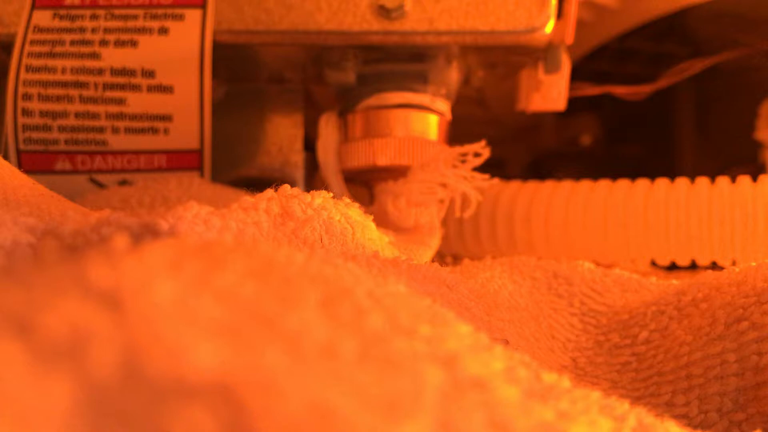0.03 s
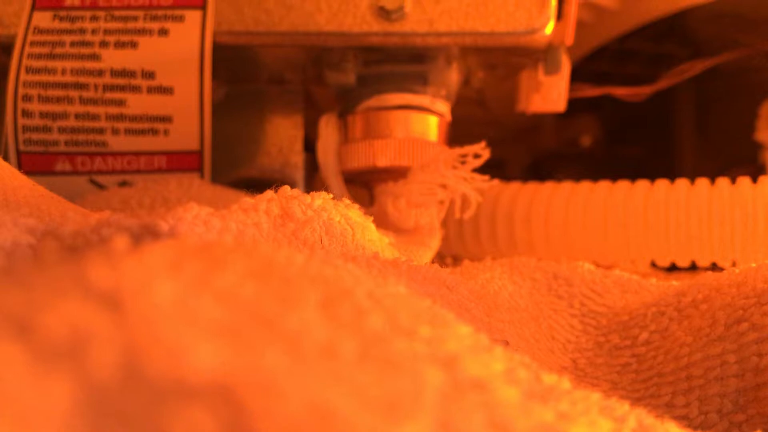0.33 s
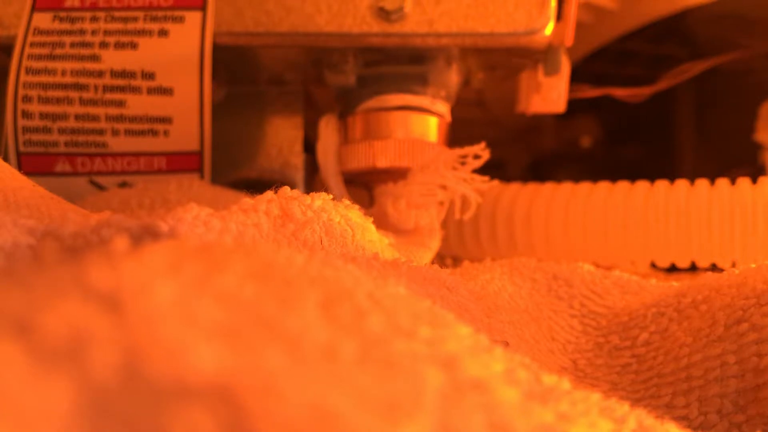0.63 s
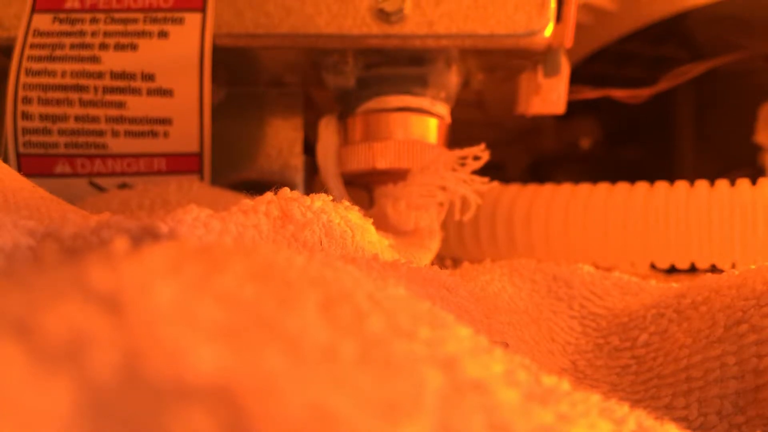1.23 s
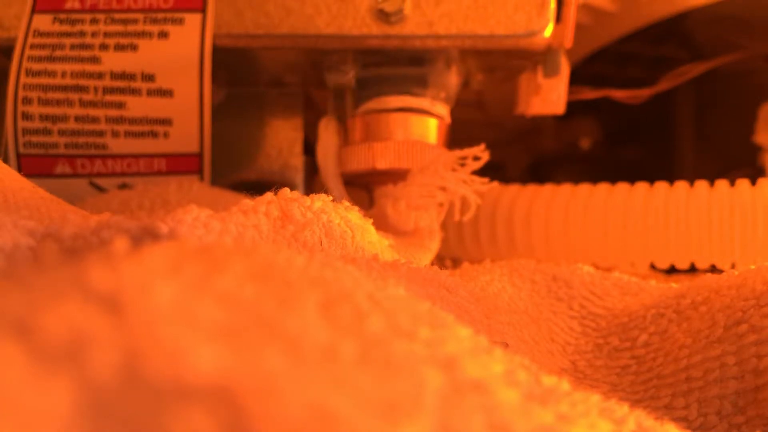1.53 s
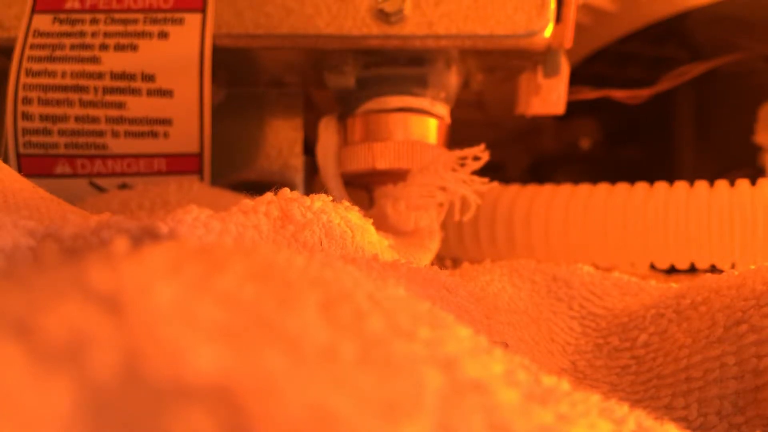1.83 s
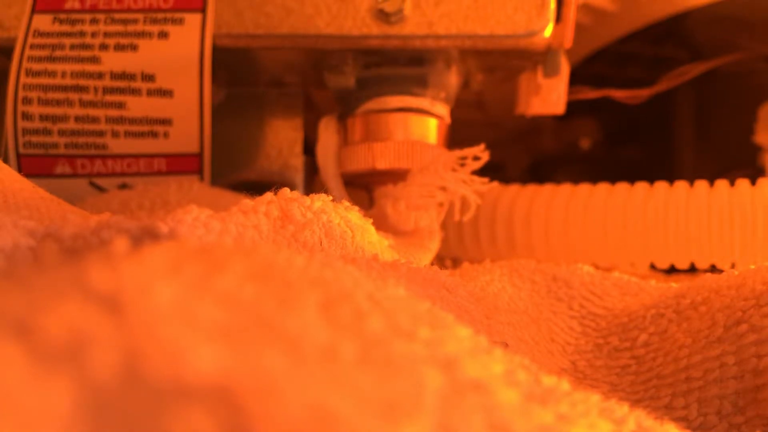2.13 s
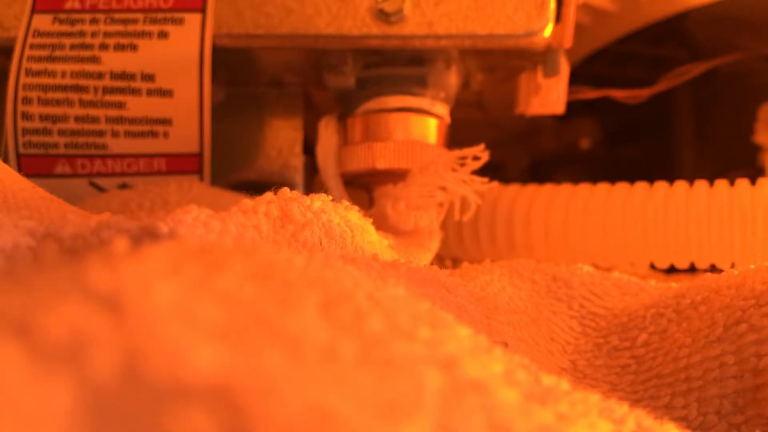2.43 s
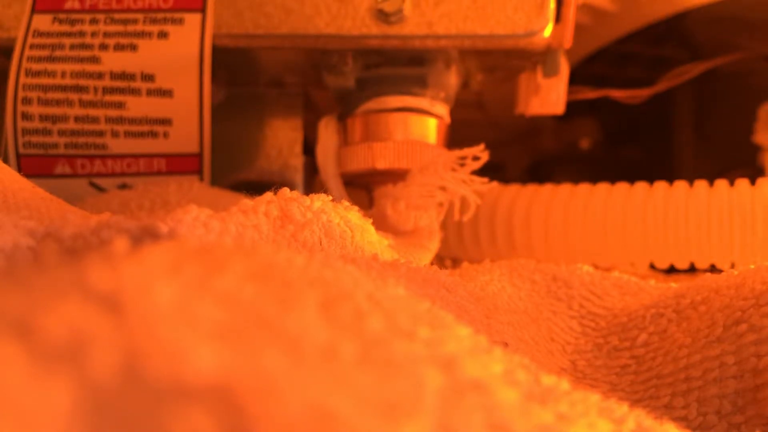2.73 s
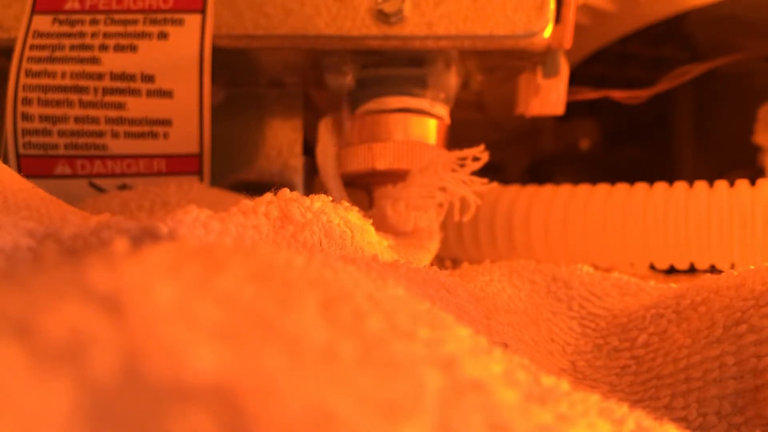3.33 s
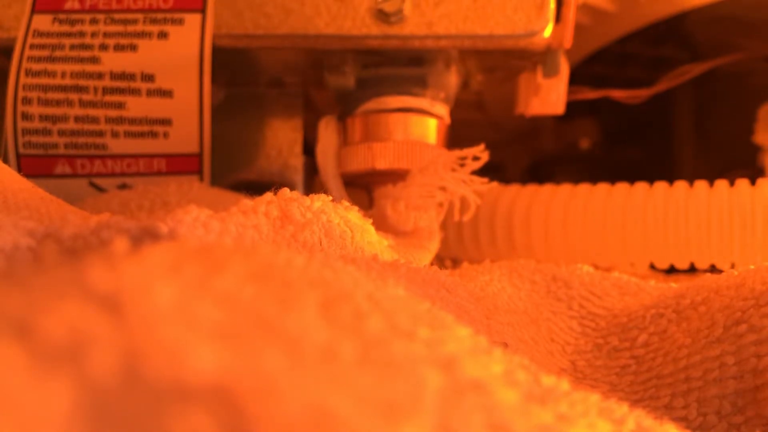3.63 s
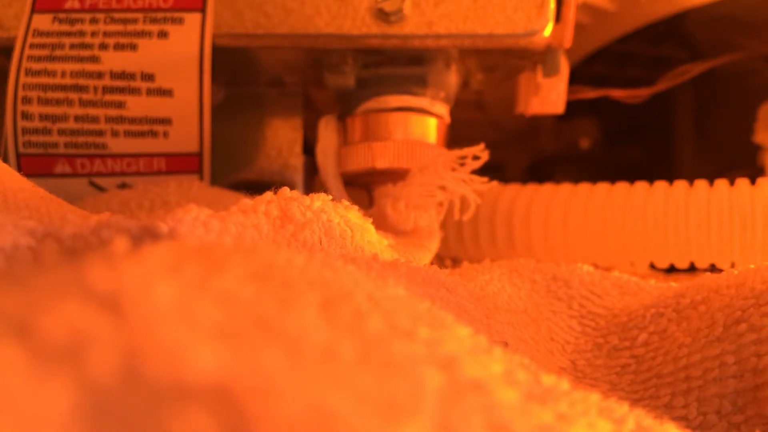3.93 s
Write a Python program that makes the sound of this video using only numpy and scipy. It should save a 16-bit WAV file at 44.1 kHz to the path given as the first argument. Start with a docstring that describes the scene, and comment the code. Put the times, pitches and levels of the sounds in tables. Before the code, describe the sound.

A dishwasher runs steadily indoors, heard close to its underside. Water rumbles in uneven surges while spray drums on the tub, over a faint motor hum, thin whine and hiss. Tiny ticks come twice.

```python
"""Dishwasher running, heard close to its underside.

Spray drums on the tub and rings its panels, water rumbles in the sump and splashes faintly inside.
The pump motor hums with a thin whine over a steady hiss, and a tiny cluster of ticks comes twice."""
import sys
import numpy as np
from scipy import signal
from scipy.fft import rfft, irfft
from scipy.io import wavfile
from scipy.ndimage import uniform_filter1d

SR = 44100
rng = np.random.default_rng(int(sys.argv[2]) if len(sys.argv) > 2 else 0)


def master_out(mix):
    """Clip the mix to full scale and print it as 16-bit PCM to the path in sys.argv[1]."""
    frames = np.transpose(np.atleast_2d(mix))
    ceiling = np.clip(frames, -1, 1)
    pcm = np.round(ceiling * 32767).astype(np.int16)
    wavfile.write(sys.argv[1], SR, pcm)


N = 176400
TIME = np.arange(N) / SR
FREQ_HZ = np.fft.rfftfreq(N, 1 / SR)


def from_db(db):
    """Decibels to gain."""
    return 10 ** (np.asarray(db) / 20)


def unit_rms(x):
    """Scale to rms 1."""
    return x / np.sqrt(np.mean(x ** 2) + 1e-20)


def envelope(rows, trim_db=0):
    """Gain curve through (time_s, level_db) rows, linear in dB."""
    return from_db(trim_db + np.interp(TIME, *np.transpose(rows)))


def drift(rate_hz):
    """Slow random wander; mean 0, rms 1."""
    slow = irfft(rfft(rng.standard_normal(N)) / (1 + (FREQ_HZ / rate_hz) ** 2), N)
    return unit_rms(slow - slow.mean())


def colour(x, spectrum):
    """Minimum-phase filter through (freq_hz, gain_db) rows; output rms 1."""
    hz, db = np.transpose(spectrum)
    gain = from_db(np.interp(np.log(FREQ_HZ + 1), np.log(hz), db))
    cepstrum = irfft(np.log(gain), N)
    cepstrum[1:N // 2] *= 2
    cepstrum[N // 2 + 1:] = 0
    return unit_rms(irfft(rfft(x) * np.exp(rfft(cepstrum)), N))


def resonate(x, centre_hz, width_hz):
    """Resonator applied twice for steep skirts; output rms 1."""
    b, a = signal.iirpeak(centre_hz, centre_hz / width_hz, fs=SR)
    return unit_rms(signal.lfilter(b, a, signal.lfilter(b, a, x)))


def hold_rms(x, window_s):
    """Hold the running rms near 1."""
    return x / np.sqrt(uniform_filter1d(x ** 2, int(window_s * SR)) + 1e-12)


def impacts(drops_per_s=2200, spread_db=1.5, wash_db=-1.5):
    """Drops of uneven size hit the wall over a smooth wash of running water."""
    sizes = from_db(spread_db * np.minimum(rng.exponential(1, N), 4))
    signs = rng.choice([-1, 1], N)
    hits = rng.random(N) < drops_per_s / SR
    drops = unit_rms(sizes * signs * hits)
    return unit_rms(drops + from_db(wash_db) * rng.standard_normal(N))


# Midrange drumming, before trim: time_s, level_db
SPRAY_ENVELOPE = [(0.15, -54), (0.16, -55), (0.29, -55), (0.3, -57), (0.38, -52.5), (0.39, -56.5),
                  (0.45, -54), (2.08, -55), (2.1, -53), (2.27, -55), (2.71, -54), (3.3, -55), (3.36, -52.5),
                  (3.38, -54.5), (3.97, -54), (3.98, -53.5)]
# Spray through the tub wall: freq_hz, gain_db
SPRAY_SPECTRUM = [(120, -26), (230, -2), (400, -1.5), (570, 0), (635, -4), (680, -0.5), (715, -5.5),
                  (780, -1.5), (960, 0.5), (1090, -0.5), (1190, -4.5), (1275, -11.5), (1345, -6.5),
                  (1420, -11), (1570, -6.5), (1700, -10), (1980, -11), (2250, -16), (2400, -18),
                  (2520, -18.5), (2650, -25), (2800, -23), (2930, -22), (3150, -23), (3430, -24.5),
                  (3620, -30), (4400, -29), (4900, -38.5), (6300, -39), (8000, -44), (16000, -70)]

def spray(flicker_db=0.5):
    """Jets patter on the tub, dulled by its wall."""
    force = impacts() * from_db(flicker_db * drift(rate_hz=11))
    return envelope(SPRAY_ENVELOPE, trim_db=2.5) * colour(force, SPRAY_SPECTRUM)


# Panel boom near 300 Hz, before mode gains: time_s, level_db
BOOM_ENVELOPE = [(0.15, -52.5), (0.16, -54.5), (0.3, -49.5), (0.37, -62), (0.41, -49.5), (0.47, -62),
                 (0.51, -54), (2.71, -56), (2.79, -52), (2.99, -55.5), (3.02, -51.5), (3.2, -55.5),
                 (3.34, -53.5), (3.37, -57.5), (3.67, -51.5), (3.7, -64), (3.85, -51), (3.98, -54)]
# Broad tub resonances: centre_hz, width_hz, gain_db
TUB_MODES = [(292.7, 67, -3), (329.8, 66, -4)]
# Panel ring, before trim: time_s, level_db
RING_ENVELOPE = [(0.15, -58), (0.62, -53), (1.08, -57.5), (1.13, -54), (1.69, -55.5), (1.75, -49.5),
                 (1.91, -60), (2.09, -52), (2.44, -60.5), (2.5, -50.5), (2.55, -60.5), (3.34, -54.5),
                 (3.4, -64), (3.55, -50.5), (3.6, -64), (3.83, -50), (3.93, -63), (3.98, -50)]

def panels(flicker_db=0.8):
    """Sheets of water make the tub's panels boom and ring."""
    boom = np.zeros(N)
    for centre_hz, width_hz, gain_db in TUB_MODES:
        force = impacts() * from_db(flicker_db * drift(rate_hz=8))
        boom += from_db(gain_db) * resonate(force, centre_hz, width_hz)
    ring = resonate(impacts(), centre_hz=506, width_hz=78)
    return envelope(BOOM_ENVELOPE) * boom + envelope(RING_ENVELOPE, trim_db=-0.5) * ring


# Sump surges, before trim: time_s, level_db
CHURN_ENVELOPE = [(0.15, -54), (0.43, -51.5), (0.48, -60), (0.53, -50), (0.6, -48), (0.66, -59),
                  (0.71, -48.5), (0.76, -51.5), (0.84, -49), (0.9, -51), (1.14, -52), (1.19, -60),
                  (1.24, -49.5), (1.37, -52), (1.41, -52), (1.47, -49), (1.54, -61), (1.6, -52.5),
                  (1.76, -50.5), (1.83, -50.5), (1.93, -52), (2.0, -47.5), (2.09, -59), (2.16, -54),
                  (2.24, -59), (2.29, -48), (2.38, -50.5), (2.47, -51), (2.52, -65), (2.62, -48.5),
                  (2.7, -52.5), (3.4, -52), (3.46, -59), (3.52, -51.5), (3.64, -59), (3.72, -50),
                  (3.91, -58.5), (3.98, -46)]
# Churning water: freq_hz, gain_db
CHURN_SPECTRUM = [(20, -45), (30, -27), (40, -12.5), (55, -1.5), (84, 0), (104, -5), (125, -7.5),
                  (160, -12), (205, -22), (300, -41.5), (600, -68.5)]
# Circulating water: freq_hz, gain_db
FLOW_SPECTRUM = [(60, -17), (110, -7), (150, 0.5), (205, -4.5), (300, -20.5), (600, -60)]

def sump(flow_db=-60):
    """Water churns in the sump in uneven surges, over the steady flow of its circulation."""
    churn = hold_rms(colour(rng.standard_normal(N), CHURN_SPECTRUM), window_s=0.075)
    flow = colour(rng.standard_normal(N), FLOW_SPECTRUM)
    return envelope(CHURN_ENVELOPE, trim_db=-0.47) * churn + from_db(flow_db) * flow


# Pump and motor hum: pitch_hz, rms_db
HUM_TONES = [(59.8, -70.5), (119.8, -64), (253.5, -62), (507, -73.5), (851, -72)]
# Motor whine: shaft_multiple, rms_db
WHINE_ORDERS = [(55, -83.5), (60, -90), (61, -80.5), (62, -84), (63, -83.5), (69, -88), (70, -86),
                (71, -88.5), (75, -92.5), (76, -91)]

def motor(shaft_hz=36.26, speed_wander=0.0012):
    """Hum and whine waver slightly in pitch with the load."""
    running_s = TIME + speed_wander * np.cumsum(drift(rate_hz=1.66)) / SR
    whine = [(multiple * shaft_hz, rms_db) for multiple, rms_db in WHINE_ORDERS]
    tones = np.zeros(N)
    for pitch_hz, rms_db in list(HUM_TONES) + whine:
        phase = 2 * np.pi * (pitch_hz * running_s + rng.random())
        tones += np.sqrt(2) * from_db(rms_db) * np.sin(phase)
    return tones


# Hiss: freq_hz, gain_db
HISS_SPECTRUM = [(1000, -3), (4000, 2), (6300, 4.5), (7750, -3), (8300, 1), (9850, 1.5), (10450, -5),
                 (11000, 0.5), (14000, 0.5), (15800, 0.5)]

def hiss(level_db=-76.5):
    """Faint, steady broadband noise."""
    return from_db(level_db) * colour(rng.standard_normal(N), HISS_SPECTRUM)


# Stray droplets: freq_hz, gain_db
DROPLET_SPECTRUM = [(2500, -14), (5000, -3), (9000, -5), (10400, -4), (12000, -1), (15500, -7)]

def droplets(drops_per_s=60, level_db=-89):
    """Stray droplets spit at random."""
    spits = rng.uniform(-1, 1, N) * (rng.random(N) < drops_per_s / SR)
    return from_db(level_db) * colour(spits, DROPLET_SPECTRUM)


# Splashes in the tub: peak_s, sigma_s, level_db
SPLASH_SWELLS = [(.67, .04, -76), (1.278, .07, -79), (1.68, .05, -77), (2.174, .06, -81),
                 (2.73, 0.036, -74), (2.96, .04, -77)]
# Falling water: freq_hz, gain_db
SPLASH_SPECTRUM = [(1800, -18), (2900, 5), (3400, 4), (3700, -2), (4400, -1), (5000, -11), (6500, -9),
                   (9000, -24)]

def splashes():
    """Falling water swells into a brief splash now and then."""
    swell = np.zeros(N)
    for peak_s, sigma_s, level_db in SPLASH_SWELLS:
        swell += from_db(level_db) * np.exp(-0.5 * ((TIME - peak_s) / sigma_s) ** 2)
    return swell * colour(impacts(), SPLASH_SPECTRUM)


def tick(start_s, level_db, decay_s, centre_hz, width_hz):
    """One dry tick: a decaying noise burst in a broad resonance."""
    age_s = TIME - start_s
    noise = hold_rms(resonate(rng.standard_normal(N), centre_hz, width_hz), window_s=0.001)
    decay = (age_s >= 0) * np.exp(-np.abs(age_s) / decay_s)
    return from_db(level_db) * decay * noise


# Tick clusters: start_s, gain_db, after_delay_s, after_level_db
TICK_CLUSTERS = [(1.7352, -1.5, 0.046, -67), (3.5152, -1, 0.08, -70)]
# Ticks per cluster, before its gain: delay_s, level_db, decay_s, centre_hz, width_hz
TICK_PATTERN = [(0, -63, .0022, 14000, 5500), (0, -68, 0.0084, 6200, 5000),
                (.0026, -67.5, .0011, 7500, 5000), (.0133, -62, .001, 8500, 2000),
                (.0133, -68, .001, 14000, 6000)]

def ticks():
    """Each cluster is a short splutter, a second tick and a small late after-tick."""
    clusters = np.zeros(N)
    for start_s, gain_db, after_delay_s, after_level_db in TICK_CLUSTERS:
        for delay_s, level_db, decay_s, centre_hz, width_hz in TICK_PATTERN:
            clusters += tick(start_s + delay_s, level_db + gain_db, decay_s, centre_hz, width_hz)
        clusters += tick(start_s + after_delay_s, after_level_db,
                         decay_s=0.001, centre_hz=11000, width_hz=16000)
    return clusters


def scene():
    """Mono sum of all sources."""
    return (spray() + panels() + sump() + motor() + hiss() + droplets() + splashes() + ticks())[None]


def record(dry, start_s=0.119, fade_s=0.002, cutoff_hz=15850):
    """The sound cuts in; a steep low-pass removes the top."""
    fade_in = np.clip((TIME - start_s) / fade_s, 0, 1)
    lowpass = signal.ellip(10, 0.1, 70, cutoff_hz, fs=SR, output="sos")
    return signal.sosfilt(lowpass, dry * fade_in)


dry = scene()
out = record(dry)
master_out(out)
```